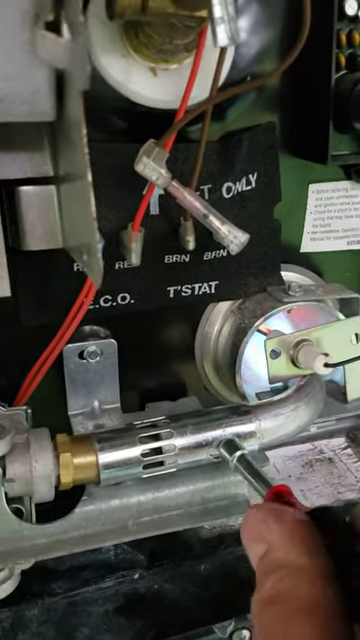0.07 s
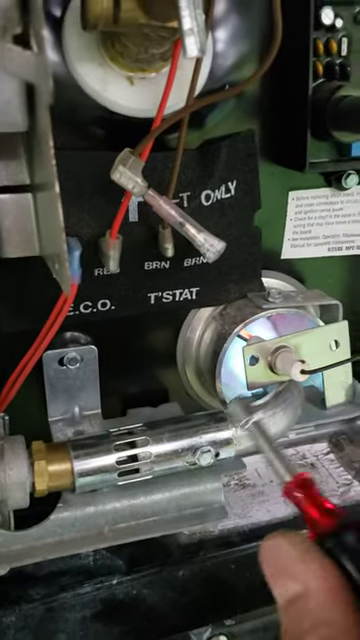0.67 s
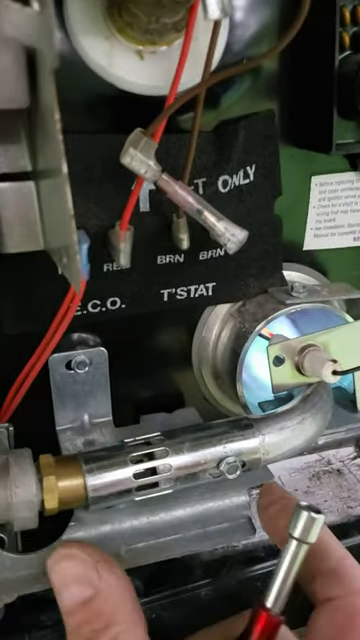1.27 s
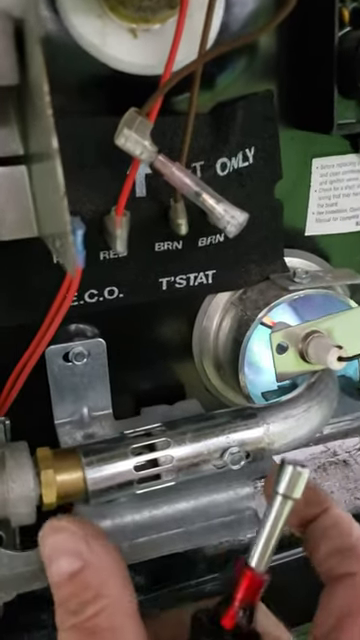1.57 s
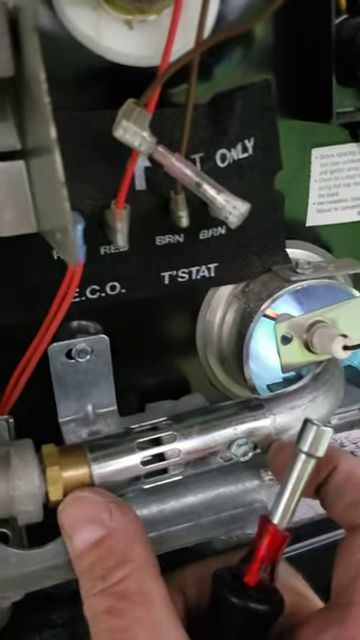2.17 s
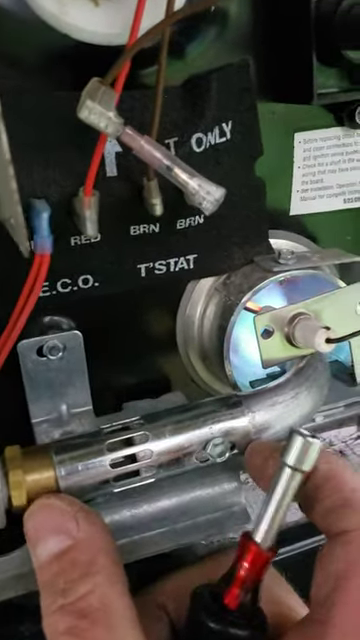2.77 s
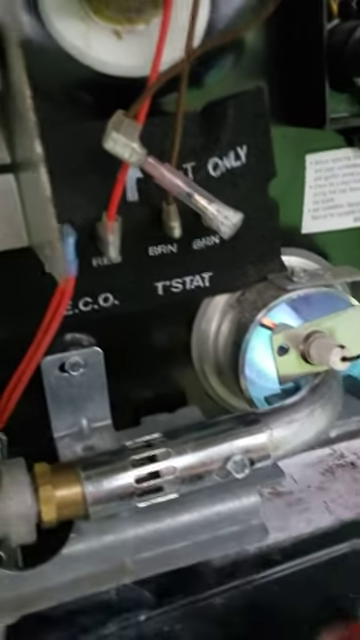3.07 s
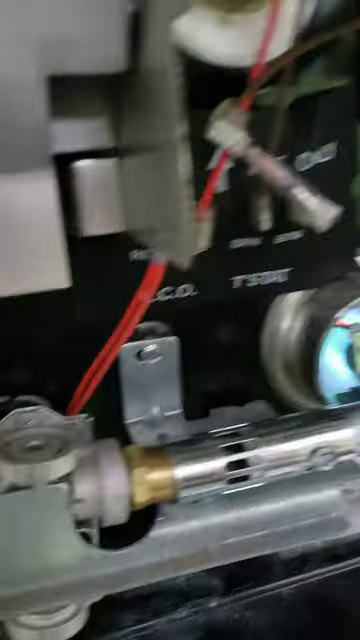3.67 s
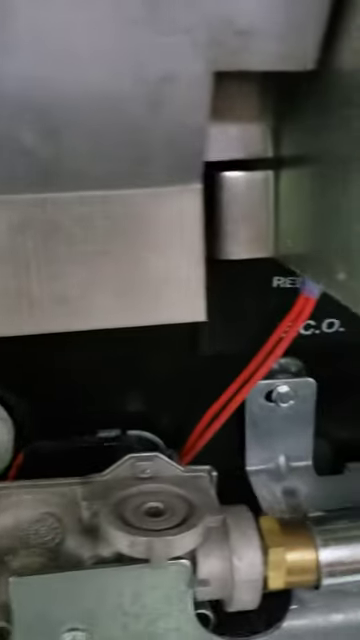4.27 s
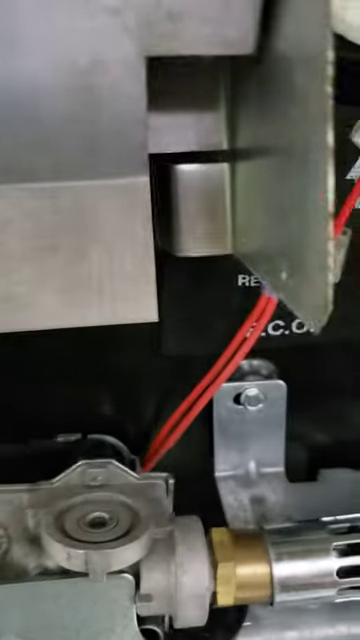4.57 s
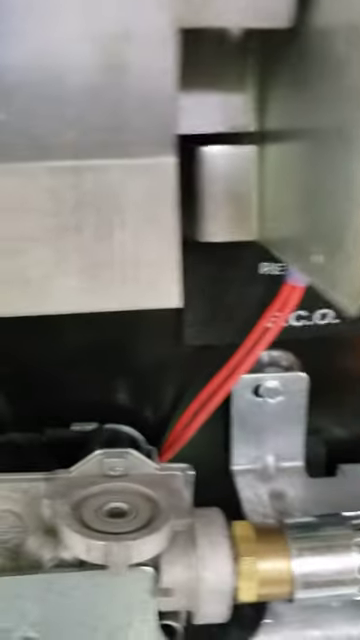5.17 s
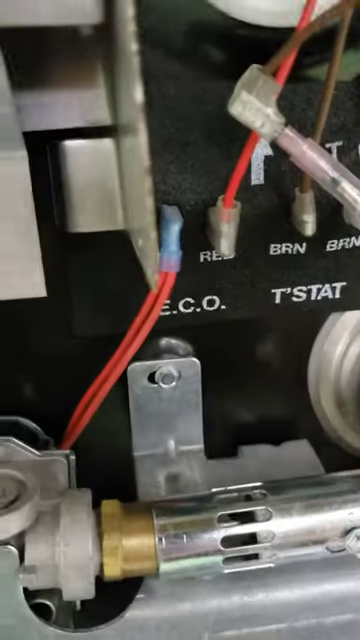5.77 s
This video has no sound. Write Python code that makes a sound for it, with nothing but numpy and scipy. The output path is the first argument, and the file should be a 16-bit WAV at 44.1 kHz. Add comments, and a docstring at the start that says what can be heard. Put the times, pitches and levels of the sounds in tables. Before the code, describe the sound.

A gas burner runs with a low, turbulent rumble and a faint hiss, heard close up in a small sheet-metal water heater compartment. A few sharp pops rattle the steel burner tube early on, and a hand scrapes lightly on metal. Later the pops return louder and more frequent, often in pairs, knocking the casing. Near the end the flame gives a deep whump, nearly dies and catches again with a pop.

```python
"""A low, turbulent rumble swells up close by: a gas burner in a small sheet-metal water heater
compartment. The flame rings the flue tube while gas hisses at the jet and air whistles into the
mixing tube. A few sharp pops rattle the steel burner tube, and a hand scrapes lightly on the metal.
The pops return thicker and louder, often in pairs, knocking the casing; late on the flame surges
with a deep whump, nearly goes out, and catches again with a pop."""
import sys
import numpy as np
from scipy import signal
from scipy.fft import rfft, irfft, next_fast_len
from scipy.io import wavfile
from scipy.ndimage import uniform_filter1d, map_coordinates

SR = 44100
rng = np.random.default_rng(int(sys.argv[2]) if len(sys.argv) > 2 else 0)


def transcribe(signal):
    """Save signal, clipped to [-1, 1], as a 16-bit WAV file at the path in sys.argv[1]."""
    frames = np.atleast_2d(signal).T
    limited = np.clip(frames, -1, 1)
    pcm = np.round(limited * 32767).astype(np.int16)
    wavfile.write(sys.argv[1], SR, pcm)


N = 264908

# the flame's slow drift in strength (time [s], level [dB])
FLAME_DRIFT = [(0.25, -25.5), (1.07, -25), (1.15, -22), (2.61, -26), (3.02, -23), (3.73, -24.5),
               (3.78, -22), (5.29, -22.5), (5.45, -25)]
# the flame starves (start [s], end [s], depth [dB])
FLAME_STARVES = [(0, 0.049, 14), (5.602, 5.664, 18)]
# the flame surges (time [s], spread [s], lift [dB])
FLAME_SURGES = [(0.133, 0.013, 3.5), (1.944, 0.0035, 6), (2.419, 0.015, 5.5), (1.183, 0.033, 0),
                (1.307, 0.0053, 4), (3.915, 0.0076, 4.5), (5.16, 0.033, 0), (5.528, 0.036, 7),
                (5.899, 0.013, 7.5)]
# soft flares (time [s], spread [s], roar [dB], fizz [dB])
FLARES = [(3.912, 0.069, -61, -66.5), (4.256, 0.0098, -42, -39), (4.47, 0.011, -41, -54.5),
          (5.408, 0.015, -34.5, -41), (5.546, 0.013, -27, -49.5)]
# tone of the low rumble, the roar above it and a flare's fizz (frequency [Hz], gain [dB])
RUMBLE_EQ = [(20, -42.5), (35, -29), (50, -12), (75, -8), (105, -1), (145, 0), (190, 2.5), (240, -2),
             (280, 1.5), (340, -11.5), (420, -20.5), (520, -32), (900, -51.5), (2000, -83)]
ROAR_EQ = [(300, -29), (520, -2.5), (900, 2.5), (1300, -9), (1800, -18), (2400, -5.5), (3200, -27),
           (8000, -63.5)]
FIZZ_EQ = [(600, -14.5), (1500, 5), (2400, 1), (3300, 3.5), (4500, -5.5), (5500, -13.5), (7500, -8),
           (8700, -17), (11000, -9.5), (14500, -6.5), (16200, -26)]
# how far the rumble leads on the left (frequency [Hz], lead [rad])
RUMBLE_LEAD = [(60, .04), (200, 0.32), (260, 0.79), (320, 0.57), (450, 1.3)]
# flue tube resonances (pitch [Hz], width [Hz], gain [dB], left minus right [dB], left lead [rad])
FLUE_MODES = [(312.8, 29, 0, 3.5, 0.86), (590, 28, -46, -21, 1.5), (717.5, 90, -19.5, 1.5, 1.36),
              (768, 55, -27.5, -6.5, 2.2), (929, 122, -35.5, 21, 2), (1136.6, 50, -18, 8.5, 1.92),
              (1260, 300, -52.5, 30.5, 4.6), (1558, 59, -31.5, 10.5, 3.2), (1918.4, 43, -28.5, 4.5, 1.63),
              (2130, 24, -40.5, -15, 3.7), (2236, 14, -43, 7, 0.6), (2300, 30, -45, 1, 9)]
# cancellations between flue modes; negative depth boosts (centre [Hz], width [Hz], depth [dB])
FLUE_NOTCHES = [(527.6, 61, 12.5), (2517, 190, 16), (1700, 97, -4.5)]
# the hollow note near 760 Hz fades, then returns at the end (time [s], gain [dB])
HOLLOW_NOTE_RIDE = [(0, 1), (3.5, -0.5), (4.2, -3.5), (5.3, -7.5), (6.01, 5.5)]
# the valley near 560 Hz fills and empties as the microphone moves (time [s], gain [dB])
VALLEY_RIDE = [(0, 4), (1.5, -3), (3.3, 0), (3.9, 7), (4.5, 5.5), (5.1, -1.5)]

# the gas jet and the air drawn into the mixing tube (time [s], relative level [dB])
JET_RIDE = [(0, -67), (2.3, -69), (3.9, -66), (6.01, -69.5)]
DRAUGHT_RIDE = [(.3, -73), (1.55, -71), (1.9, -84), (2.75, -84.5), (3.0, -70), (3.5, -67.5), (4.2, -69),
                (6.01, -72)]
# tone of the jet's hiss and of the draught (frequency [Hz], gain [dB])
JET_EQ = [(4000, -25), (8500, -7.5), (10500, -2.5), (12200, 1.5), (13500, 1), (15000, 2.5), (15800, 2),
          (16100, -33.5)]
DRAUGHT_EQ = [(1200, -29.5), (2500, 7), (3300, 6.5), (4300, 0.5), (6500, -12), (8500, -13), (11000, -22),
              (16000, -26.5)]
# breathy whistles in the jet (time [s], spread [s], pitch [Hz], level [dB])
JET_WHISTLES = [(1.952, .2, 13240, -77), (2.5, .3, 13830, -70.5), (4.298, .5, 11780, -68.5)]
# faint, thin high tones (time [s], spread [s], pitch [Hz], level [dB])
FAINT_TONES = [(.6, .5, 4200, -83), (2.502, 1.3, 7000, -86.5)]

# pop cues, with a relative level for each layer (time [s], crack [dB], body [dB], sizzle [dB],
# steel ring [dB], favoured ring pitch [Hz], t60 of the lowest steel mode [s], glint pitch [Hz])
POPS = [(0.163, -61, -60, -58.5, -59.5, 3700, .05, 4360), (.556, -61, -48, -72, -64, 3700, .04, 3700),
        (0.6201, -41, -39, -37.5, -41, 3240, 0.19, 6440),
        (0.8813, -56.5, -45, -66, -45.5, 3300, 0.04, 2880),
        (1.0713, -56.5, -61.5, -51, -62, 5400, 0.055, 7500), (4.1026, -36, -31, -36, -33, 2740, 0.21, 7000),
        (4.342, -34, -33, -40, -32, 3200, .17, 7300), (4.543, -32.5, -29.5, -38.5, -31, 3385, 0.14, 4280),
        (4.7279, -32, -27.5, -29, -30.5, 3760, 0.14, 7340), (4.766, -28.5, -24, -31, -35.5, 2730, .1, 3980),
        (4.85, -53.5, -33.5, -63, -48.5, 3300, 0.23, 7200), (5.0097, -28, -33, -32, -32, 2590, 0.22, 3400),
        (5.0234, -26.5, -24, -18.5, -36, 3620, 0.31, 7700),
        (5.3292, -30.5, -26.5, -34, -29, 3320, 0.11, 6540),
        (5.341, -22, -22.5, -27, -27, 2750, 0.091, 7000),
        (5.651, -25.5, -21, -22.5, -38.5, 3680, 0.2, 6400), (5.91, -31, -27, -28, -33.5, 4130, 0.13, 4100),
        (5.9239, -22, -21, -16.5, -33, 6260, 0.17, 5140)]
# overall tone of a pop (frequency [Hz], gain [dB])
POP_EQ = [(300, 8), (600, 1), (1000, 7.5), (1700, 1), (2400, -3.5), (3100, -5), (4100, -1.5), (5300, -0.5),
          (5900, -6.5), (6500, -5.5), (7600, -4), (8700, -10), (10500, -3), (13000, -0.5), (15500, 1),
          (16200, -23)]
# resonances of the sheet-metal walls (pitch [Hz], width [Hz], gain [dB])
WALL_MODES = [(683, 16, 8), (972, 45, 3.5), (1610, 34, 4.5), (1660, 37, -3.5), (1870, 110, -7.5),
              (2750, 150, 3.5), (3850, 69, 0), (4050, 55, 2.5), (5000, 190, -11), (6800, 56, -5.5)]
# modes of the steel burner tube (pitch [Hz], gain [dB])
BURNER_MODES = [(2611, 1), (2708, 5.5), (2810, 6.5), (3130, -3), (3257, 4.5), (3330, 0.5), (3569, 1.5),
                (3660, 0), (3765, 2), (4037, 1.5), (4307, -3.5), (5150, -5.5), (5539, -8.5), (6320, -7.5),
                (6570, -6), (7014, -11), (7650, 0)]
# hollow knocks in the casing, most landing on the harder pops (time [s], pitch [Hz], level [dB])
CASING_KNOCKS = [(0.62, 1914, -39), (0.8796, 1874, -44.5), (4.245, 1210, -32.5), (4.543, 1613, -30),
                 (4.767, 1622, -29.5), (5.01, 1666, -26), (5.024, 1740, -25), (5.341, 1760, -26.5),
                 (5.403, 1740, -33), (5.651, 1622, -24), (5.924, 1930, -24)]
# light strokes of a hand on the metal (time [s], spread [s], level [dB], rasp pitch [Hz])
HAND_SCRAPES = [(1.163, 0.013, -60.5, 5830), (1.208, 0.024, -63.5, 7000), (1.29, 0.06, -63.5, 5630),
                (1.502, 0.04, -66, 5020), (1.653, 0.019, -59.5, 5480), (2.93, 0.07, -65.5, 4690),
                (3.741, .007, -62.5, 7000), (3.86, .045, -61, 4350)]
# tone of the scrapes' grit and of the late whump (frequency [Hz], gain [dB])
GRIT_EQ = [(1500, -15), (3000, -1), (5500, -6.5), (7500, -5), (8700, -15.5), (12000, 0), (15500, -11.5),
           (16200, -31)]
WHUMP_EQ = [(20, -34), (45, 0.5), (85, 9.5), (130, -9.5), (300, -58.5)]

# the right microphone port is shaded (frequency [Hz], left minus right [dB])
PORT_SHADE = [(40, 4.5), (100, 2.5), (380, 4), (700, 6.5), (1290, 7), (2380, 1), (4400, 10.5), (7400, 13.5),
              (9000, -0.5), (11000, 1.5), (13000, 6.5), (16000, 10)]
# the image drifts leftward as the microphone moves (time [s], left minus right [dB])
PAN_RIDE = [(3.2, -1.15), (5.0, -0.1)]
TOP_HZ = 16400


def amp(db):
    """Decibels to gain."""
    return 10 ** (np.asarray(db) / 20)


def unit(x):
    """Normalise to rms 1."""
    return x / np.sqrt(np.mean(x ** 2) + 1e-20)


def along(points, hz):
    """Read (frequency, value) points on a log axis."""
    f, v = np.transpose(points)
    return np.interp(np.log(hz + 1), np.log(f + 1), v)


def ride(points):
    """A fader ride through (time, value) points, one value per sample."""
    return np.interp(np.arange(N) / SR, *np.transpose(points))


def bell(x, centre, spread):
    """A Gaussian bell of height 1; spread is its standard deviation."""
    return np.exp(-.5 * ((x - centre) / spread) ** 2)


def swell(at, spread):
    """A bell-shaped fade in and out around a moment, in seconds."""
    return bell(np.arange(N) / SR, at, spread)


def wobble(per_s):
    """Smooth random modulation through per_s random points a second."""
    points = rng.standard_normal(int(N * per_s / SR) + 4)
    return map_coordinates(points, [np.arange(N) * per_s / SR])


def filtered(x, response):
    """Filter x by a complex response of frequency."""
    size = next_fast_len(N + SR // 2)
    return irfft(rfft(x, size) * response(np.fft.rfftfreq(size, 1 / SR)), size)[..., :N]


def resonance(f, hz, width):
    """One damped mode, gain 1 at its centre."""
    return 1j * f * width / (hz * hz - f * f + 1j * f * width)


def pan(balance_db, lead=0):
    """Left and right gains for a level and phase difference."""
    sides = np.array([[.5], [-.5]])
    return amp(sides * balance_db) * np.exp(1j * sides * lead)


def shade(hz, lead=0):
    """Left and right gains with the right port shaded."""
    return pan(along(PORT_SHADE, hz), lead)


def rush(eq, channels=2):
    """Coloured stereo noise of rms 1; one channel feeds the same noise to both sides."""
    noise = rng.standard_normal((channels, N))
    return unit(filtered(noise, lambda f: amp(along(eq, f)) * shade(f)))


def breathy(hz, width_hz):
    """A breathy tone of rms 1: noise in one sharp resonance."""
    noise = rng.standard_normal((2, N))
    return unit(filtered(noise, lambda f: resonance(f, hz, width_hz) ** 2 * shade(f)))


def levelled(x, seconds):
    """Hold noise at rms 1, evening out swells slower than the window."""
    power = uniform_filter1d(np.mean(x ** 2, axis=0), int(seconds * SR))
    return x / np.sqrt(np.abs(power) + 1e-12)


def patchy(x, depth_db, bins, frames):
    """Let a noise's colour drift in random patches of frequency and time."""
    spectrum = signal.stft(x, nperseg=512)[2]
    patches = uniform_filter1d(rng.standard_normal(spectrum.shape[1:]), bins, axis=0)
    patches = unit(uniform_filter1d(patches, frames, axis=1))
    return unit(signal.istft(spectrum * amp(depth_db * patches), nperseg=512)[1][:, :N])


def starvation(collapse_s=0.049, recover_s=0.061):
    """Decibels the starving flame loses: a quick collapse, a hold, a slower recovery."""
    return sum(ride([(start - collapse_s / 2, 0), (start + collapse_s / 2, depth_db),
                     (end, depth_db), (end + recover_s, 0)])
               for start, end, depth_db in FLAME_STARVES)


def flame_strength():
    """The flame's level in dB: it drifts, flutters, surges and starves."""
    flutter_db = 0.82 * wobble(per_s=24)
    lift_db = sum(db * swell(at, spread) for at, spread, db in FLAME_SURGES)
    return ride(FLAME_DRIFT) + flutter_db + lift_db - starvation()


def flue(modes, skirt):
    """Turbulence rings the flue's modes; a resonance skirt times wider steepens each one's sides."""
    def tube(f):
        return sum(amp(db) * resonance(f, hz, width) * resonance(f, hz, skirt * width)
                   * pan(side_db, lead) for hz, width, db, side_db, lead in modes)
    return unit(filtered(rng.standard_normal(N), tube))


def flame():
    """Low combustion rumble, the flue's lowest note, and a fluttering roar in its upper modes."""
    strength_db = flame_strength()
    combustion = unit(rush(RUMBLE_EQ, channels=1)[0])
    low_note = amp(0.5) * unit(flue(FLUE_MODES[:1], skirt=3.16)[0])
    rumble = filtered(combustion + low_note, lambda f: shade(f, along(RUMBLE_LEAD, f)))
    rumble = levelled(rumble, seconds=0.15)
    roar = unit(flue(FLUE_MODES[1:], skirt=3.2) + amp(-10.5) * rush(ROAR_EQ))
    roar *= amp(1.1 * wobble(per_s=70))
    # the roar follows the flame's strength, only more gently
    roar_gain = amp(-43 + 0.74 * (strength_db - np.median(strength_db)))
    flare_gain = sum(amp(roar_db) * swell(at, spread) for at, spread, roar_db, _ in FLARES)
    return amp(strength_db) * rumble + np.hypot(roar_gain, flare_gain) * roar


def hollow(x):
    """Neighbouring flue modes cancel in valleys; a hollow note and the valley below wax and wane."""
    def notches(f):
        return np.prod([1 - (1 - amp(-depth_db)) * resonance(f, hz, width)
                        for hz, width, depth_db in FLUE_NOTCHES], axis=0)
    x = filtered(x, notches)
    note = filtered(x, lambda f: bell(f, 760, 90))
    valley = filtered(x, lambda f: bell(f, 560, 55))
    return x + (amp(ride(HOLLOW_NOTE_RIDE)) - 1) * note + (amp(ride(VALLEY_RIDE)) - 1) * valley


def gas():
    """The jet hisses, the flame draws air whistling into the mixing tube, and each flare fizzes."""
    jet_gain = amp(ride(JET_RIDE) + 5.0 + .4 * wobble(per_s=13))
    hiss = patchy(rush(JET_EQ), depth_db=1.3, bins=6, frames=140)
    whistles = sum(amp(db) * swell(at, spread) * breathy(hz, width_hz=300)
                   for at, spread, hz, db in JET_WHISTLES)
    # the draught sags almost as far as the starving flame
    draught_gain = amp(ride(DRAUGHT_RIDE) + 1.5 - 0.95 * starvation() + 2.5 * wobble(per_s=27))
    air = rush(DRAUGHT_EQ) + amp(1) * breathy(hz=1965, width_hz=160)
    fizz_gain = sum(amp(fizz_db) * swell(at, spread) for at, spread, _, fizz_db in FLARES)
    fizz = unit(amp(1.7 * wobble(per_s=270)) * rush(FIZZ_EQ))
    return jet_gain * hiss + whistles + draught_gain * air + fizz_gain * fizz


def between_walls(x, echo_db, count=10):
    """Near walls return weak copies within 4 ms, combing the treble differently on each side."""
    echoes = np.zeros((2, SR // 100))
    for side in echoes:
        side[rng.integers(8, SR // 250, count)] = rng.standard_normal(count)
    echoes *= amp(echo_db) / np.linalg.norm(echoes, axis=1, keepdims=True)
    echoes[:, 0] = 1  # the direct sound
    return signal.fftconvolve(x, echoes, axes=1)[:, :N] / np.hypot(1, amp(echo_db))


def faint_tones():
    """Faint, thin, steady-pitched high tones come and go."""
    return sum(amp(db) * swell(at, spread) * np.sin(2 * np.pi * hz * np.arange(N) / SR)
               for at, spread, hz, db in FAINT_TONES)


def pop_decays(levels_db, t60, rise):
    """Power envelope in which every pop starts a decay at its own level."""
    t = np.arange(SR // 2) / SR
    shape = ((1 - np.exp(-t / rise)) * amp(-60 * t / t60)) ** 2
    power = np.zeros(N + len(t))
    for (at, *_), db in zip(POPS, levels_db):
        power[int(at * SR):][:len(t)] += amp(db) ** 2 * shape
    return power[:N]


def pop_band(lo_hz, hi_hz, levels_db, t60, tail_db, tail_t60, rise):
    """One band of the pops: a dense clatter of near reflections, then the compartment's ring."""
    def colour(f):
        band = 1 / np.sqrt((1 + (lo_hz / (f + 1)) ** 8) * (1 + (f / hi_hz) ** 8))
        walls = 1 + sum(amp(db) * resonance(f, hz, width) for hz, width, db in WALL_MODES)
        return band * walls * amp(along(POP_EQ, f)) * shade(f)
    clatter = filtered(rng.standard_normal((2, N)), colour)
    clatter = patchy(clatter, depth_db=3.2, bins=4, frames=50)  # each pop gets its own colour
    power = pop_decays(levels_db, t60, rise) + pop_decays(levels_db + tail_db, tail_t60, rise)
    return levelled(clatter, seconds=0.0036) * np.sqrt(power)


def pops():
    """A pop's crack and sizzle die fast; its thump and body linger between the walls."""
    _, crack_db, body_db, sizzle_db, *_ = np.transpose(POPS)
    thump = pop_band(89, 420, body_db + 1, t60=0.22, tail_db=-28, tail_t60=0.18, rise=0.0038)
    body = pop_band(820, 2200, body_db, t60=0.092, tail_db=-16, tail_t60=0.46, rise=0.00065)
    crack = pop_band(2200, 8500, crack_db + 4, t60=0.035, tail_db=-22.5, tail_t60=0.2, rise=0.0003)
    sizzle = pop_band(8500, TOP_HZ, sizzle_db + 5.5, t60=0.029, tail_db=-18, tail_t60=0.11, rise=0.0003)
    return thump + body + between_walls(crack + sizzle, echo_db=-6)


def clank(at, hz, db, width_hz, t60, rise):
    """One struck, heavily damped resonance; its pitch rattles over its width."""
    t = np.arange(SR // 4) / SR
    rattle = map_coordinates(rng.standard_normal(2000), [2 * t * width_hz])
    phase = 2 * np.pi * (np.cumsum(hz + width_hz * rattle) / SR + rng.random((2, 1)))
    envelope = amp(db - 60 * t / t60) * (1 - np.exp(-t / rise))
    ring = np.sqrt(2) * unit(shade(hz).real) * np.sin(phase) * envelope
    return np.pad(ring, ((0, 0), (int(at * SR), N)))[:, :N]


def glints():
    """A brief, bright peak sharpens each crack at its own pitch."""
    return sum(clank(at, hz, crack_db - 1.5, width_hz=350, t60=0.053, rise=0.0004)
               for at, crack_db, *_, hz in POPS)


def steel_ring(favour_db=6, favour_octaves=0.096, detune=0.002, blur_hz=17):
    """Every pop rattles the burner tube, driving one region of its modes harder than the rest."""
    hz, db = np.transpose(BURNER_MODES)[:, :, None]
    t = np.arange(SR // 3) / SR
    out = np.zeros((2, N + len(t)))
    for at, *_, ring_db, favoured_hz, t60, _ in POPS:
        mode_t60 = t60 * np.sqrt(hz.min() / hz)  # higher modes die sooner
        envelope = amp(-60 * t / mode_t60) * (1 - np.exp(-t / 0.0014))
        boost_db = favour_db * bell(np.log2(hz.T / favoured_hz), 0, favour_octaves)
        mix = unit(amp(db.T + boost_db + 2 * rng.standard_normal(len(hz)))) / np.sqrt(len(hz))
        phase = np.exp(2j * np.pi * rng.random((2, len(hz))))
        pitch = hz * (1 + detune * rng.standard_normal(hz.shape))
        # a wandering phase blurs each partial
        rattle = np.cumsum(rng.standard_normal(envelope.shape), axis=1)
        rattle *= np.sqrt(2 * np.pi * blur_hz / SR)
        modes = envelope * np.exp(1j * (2 * np.pi * pitch * t + rattle))
        out[:, int(at * SR):][:, :len(t)] += amp(ring_db) * ((mix * phase * shade(hz.T)) @ modes).real
    return out[:, :N]


def knocks():
    """Dull, quickly damped knocks, each ringing one broad resonance of the casing."""
    return sum(clank(at, hz, db, width_hz=200, t60=0.07, rise=0.00063) for at, hz, db in CASING_KNOCKS)


def scrapes(rasp_db=-6):
    """A hand rubs the metal in gritty strokes, each rasping at its own pitch; one squeaks."""
    grit = rush(GRIT_EQ)
    strokes = sum(amp(db) * swell(at, spread) * (grit + amp(rasp_db) * breathy(hz, width_hz=740))
                  for at, spread, db, hz in HAND_SCRAPES)
    squeak = amp(-67) * swell(at=1.65, spread=0.028) * breathy(hz=5500, width_hz=100)
    roughness = unit(amp(3 * wobble(per_s=350)))
    return strokes * roughness / np.hypot(1, amp(rasp_db)) + squeak


def whump():
    """Just before it nearly goes out, the flame surges with a deep whump."""
    return amp(-25) * swell(at=5.548, spread=0.016) * rush(WHUMP_EQ, channels=1)


def scene():
    """The mix: a bed of flame, gas and scrapes under the pops and ringing metal, slowly panned."""
    bed = hollow(flame()) + whump() + between_walls(gas() + scrapes(), echo_db=-11) + faint_tones()
    hits = pops() + glints() + steel_ring() + knocks()
    return (bed + hits) * pan(ride(PAN_RIDE)).real


def record(dry):
    """The microphone keeps nothing above its band limit."""
    return filtered(dry, lambda hz: hz < TOP_HZ)


dry = scene()
out = record(dry)
transcribe(out)
```